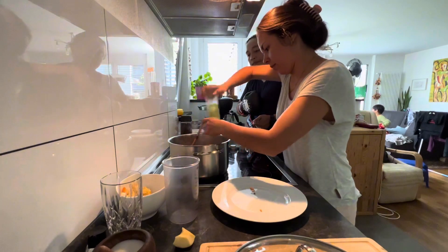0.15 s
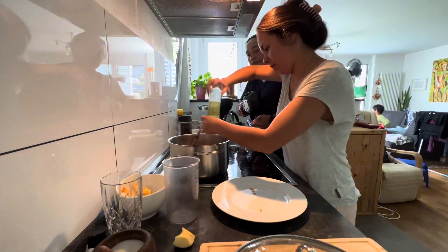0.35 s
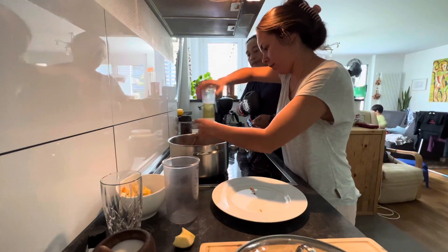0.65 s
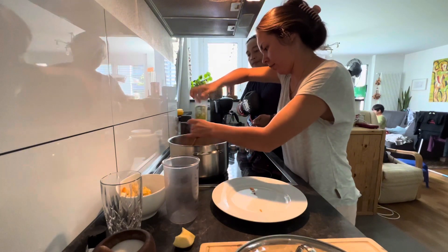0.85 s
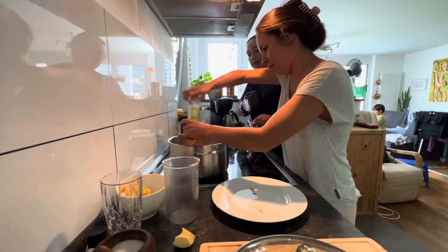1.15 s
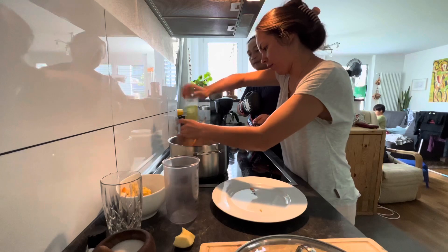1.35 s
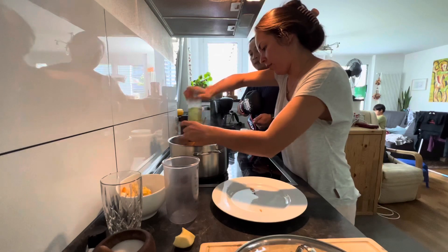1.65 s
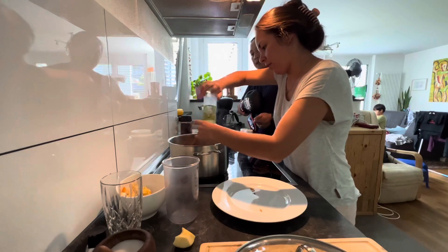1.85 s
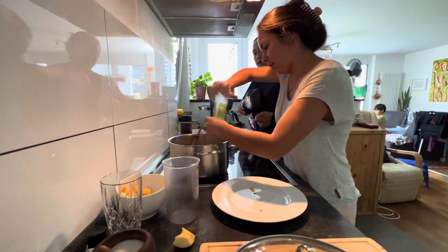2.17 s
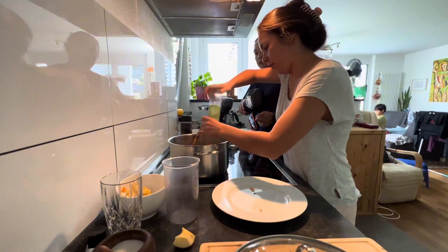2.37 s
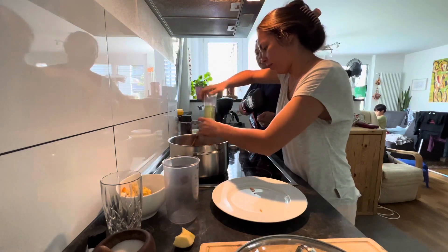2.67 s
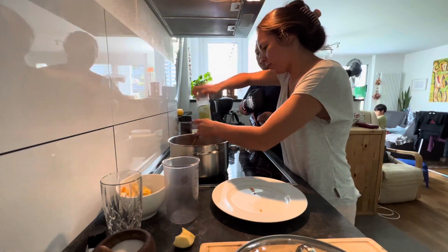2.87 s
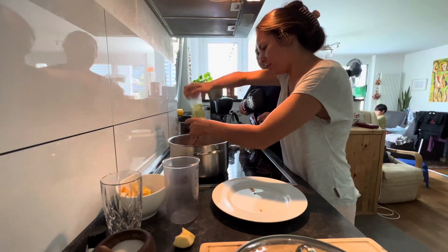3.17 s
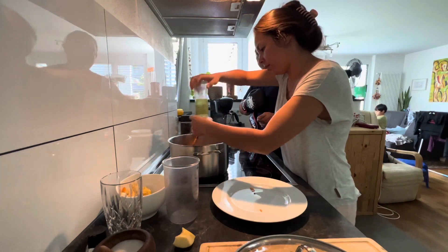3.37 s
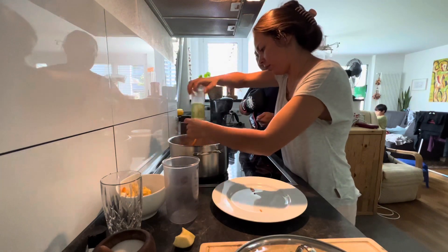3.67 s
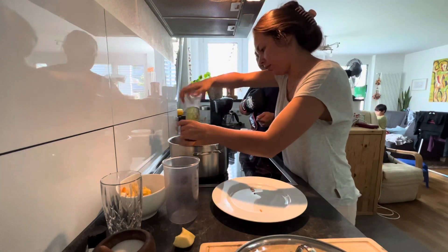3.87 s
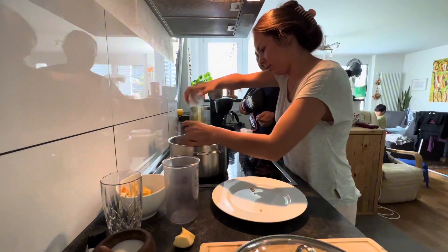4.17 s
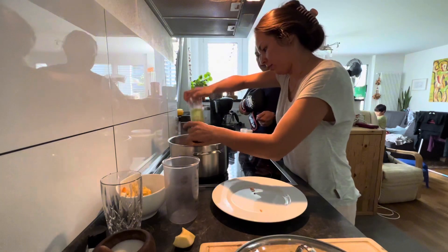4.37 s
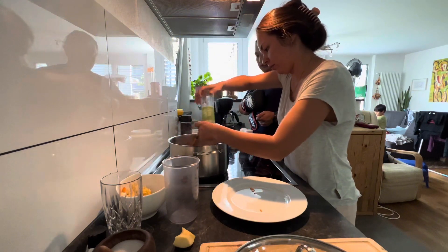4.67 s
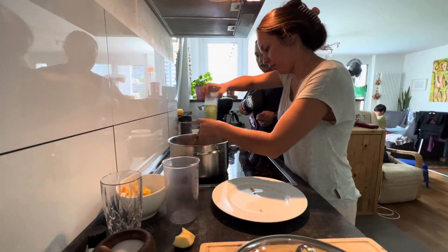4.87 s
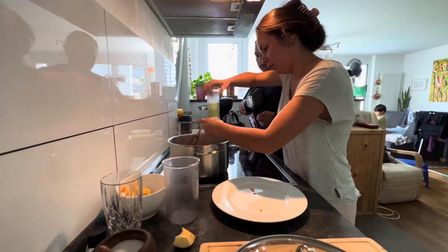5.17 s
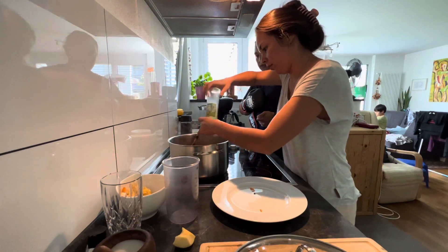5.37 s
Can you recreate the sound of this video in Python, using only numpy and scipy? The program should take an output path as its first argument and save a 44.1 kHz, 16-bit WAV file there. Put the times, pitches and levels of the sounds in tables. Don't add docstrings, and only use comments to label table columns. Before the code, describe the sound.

In a home kitchen, a glass-bodied pepper mill is twisted by hand close to a stereo microphone. From about 0.13 s the turns come every 0.3 s, each a short burst under a tenth of a second: a sharp dry snap, then gritty splintering of peppercorns with a small hollow, glassy resonance. Strength varies; turns near 0.77, 1.94 and 3.74 s bite hard, the one at 1.06 s starts weakly, and an especially loud crack comes around 4.07 s. Between turns, fingers rub and slide faintly, and soft low palm thuds come through the counter. After the turn at 4.33 s there is a gap with only small rustles, then grinding resumes at 4.9 and 5.19 s, ending in a gentler, duller crunch from 5.46 s as the sound cuts off. Tiles give quick reflections and a short bright tail. A quiet airy extractor fan with faint low hum continues throughout.

```python
import sys
import numpy as np
from scipy import signal
from scipy.fft import rfft, irfft, next_fast_len
from scipy.io import wavfile

SR = 44100
rng = np.random.default_rng(int(sys.argv[2]) if len(sys.argv) > 2 else 0)


def volts_from_db(level):
    exponent = np.asarray(level, float) / 20
    return 10 ** exponent


def generate_wav(signal):
    frames = np.transpose(np.atleast_2d(signal))
    scaled = np.clip(frames, -1, 1) * 32767
    pcm = np.round(scaled).astype(np.int16)
    wavfile.write(sys.argv[1], SR, pcm)


N = 243413
SIZE = next_fast_len(N + SR)
HZ = np.maximum(np.arange(SIZE // 2 + 1) * SR / SIZE, 1.)
PORT_LAG_S = 11.15 / 44100


def rms_one(x):
    return x / np.sqrt(np.mean(x ** 2) + 1e-20)


def at_hz(points, hz):
    table_hz, values = np.transpose(points)
    return np.interp(np.log(hz), np.log(table_hz), values)


def colour(x, spectrum):
    cepstrum = irfft(np.log(volts_from_db(at_hz(spectrum, HZ))), SIZE)
    cepstrum[1:SIZE // 2] *= 2
    cepstrum[SIZE // 2 + 1:] = 0
    response = np.exp(rfft(cepstrum))
    return irfft(rfft(x, SIZE) * response, SIZE)[..., :N]


def split(x, low_hz, high_hz):
    low = signal.sosfilt(signal.butter(2, low_hz, fs=SR, output="sos"), x)
    high = signal.sosfilt(signal.butter(2, high_hz, "high", fs=SR, output="sos"), x)
    return low, x - low - high, high


def drift(hz):
    r = np.exp(-2 * np.pi * hz / SR)
    noise = rng.standard_normal(N + SR)
    return rms_one(signal.lfilter([1], [1, -2 * r, r * r], noise)[SR:])


def ring(clicks, hz, t60):
    r = volts_from_db(-60 / (t60 * SR))
    w = 2 * np.pi * hz / SR
    return signal.lfilter([0, np.sin(w)], [1, -2 * r * np.cos(w), r * r], clicks + 1e-18)


def grains(per_s, uneven_db):
    sizes = volts_from_db(uneven_db * np.minimum(rng.exponential(1, N), 4)) * rng.choice([-1, 1], N)
    return rms_one(sizes * (rng.random(N) < per_s / SR))


def add_at(track, s, burst):
    i = round(s * SR)
    track[..., i:i + burst.shape[-1]] += burst[..., :N - i]


def ports(pair, shared, low_hz, high_hz):
    low = 1 / (1 + (HZ / low_hz) ** 2)
    high = 1 / (1 + (high_hz / HZ) ** 30)
    late = np.exp(-2j * np.pi * HZ * PORT_LAG_S * np.array([[0], [1]]))
    diffuse = np.sqrt(np.clip(1 - low - high, 0, 1)) * pair
    return diffuse + (np.sqrt(low) + np.sqrt(high) * late) * shared


# (frequency [Hz], level [dB per Hz])
AIRFLOW = [(20, -33), (50, -16), (80, -18), (120, -9), (180, -24), (300, -20), (600, -36), (1000, -28),
           (1500, -16), (1900, -13), (2350, -31), (4000, -41), (5500, -36), (8000, -37), (12000, -43),
           (16500, -48)]


def fan():
    white = rfft(rng.standard_normal((3, SIZE)))
    air = ports(white[:2], white[2], low_hz=150, high_hz=11000) * volts_from_db(at_hz(AIRFLOW, HZ))
    air = irfft(air, SIZE)[:, :N]
    hum_hz, hum_db, air_db = 100, -64.5, -60
    hum = np.sin(2 * np.pi * hum_hz * np.arange(N) / SR + drift(2.8))
    hum *= volts_from_db(hum_db + 2.4 * drift(5.9))
    return volts_from_db(air_db + 0.14 * drift(11.0)) * rms_one(air) + hum


# (time [s], level [dB])
RUBBING = [(0, -47.5), (0.6, -54), (1.5, -49), (2.3, -53.5), (3.1, -52.5), (3.9, -53), (4.35, -49),
           (4.65, -85), (4.9, -51.5), (5.1, -55.5), (5.52, -50)]
# (start [s], length [s], grinding [dB], first bite [dB], low share [dB])
TURNS = [(0.1263, 0.095, -39, -24, 4), (0.4513, 0.094, -39.5, -23.5, 2), (0.7714, 0.075, -35, -12, 2.5),
         (1.0593, 0.065, -39.5, -32.5, -2.5), (1.3255, 0.082, -39, -25, -6),
         (1.6415, 0.053, -40.5, -19, 3.5), (1.943, 0.066, -29, -17, 0.5), (2.2346, 0.051, -35, -15, 2.5),
         (2.5405, 0.1, -44.5, -18, 4), (2.8477, 0.072, -40, -30, 0.5), (3.155, 0.086, -41, -19, 1),
         (3.4353, 0.076, -41, -19.5, 4.5), (3.7367, 0.082, -32.5, -17, -0.5),
         (4.0308, 0.081, -35.5, -27.5, -4), (4.3332, 0.052, -36.5, -26.5, 3), (4.897, 0.05, -40.5, -24, 2),
         (5.191, 0.053, -38, -31, 0.5), (5.462, 0.19, -45, -51, 7)]


def friction():
    engage_s, release_s = 0.0032, 0.0065
    creep_db, creep_s = -15, 0.004
    loading_db, dulling_db = -4, 2
    rub_low_db, lift_low_db, lift_s = -2.5, -10, 0.07
    t = np.arange(N) / SR
    level = volts_from_db(np.interp(t, *np.transpose(RUBBING)) - 17.5) * np.ones((3, 1))
    lift = sum(np.clip(1 + (t - s) / lift_s, 0, 1) * (t < s) for s, *_ in TURNS)
    level[0] *= volts_from_db(rub_low_db + lift_low_db * lift + 11.5)
    for s, length_s, db, _, low_db in TURNS:
        i = round(s * SR)
        before = t[SR // 20:0:-1]
        level[:, i - SR // 20:i] += volts_from_db(db + creep_db) * np.exp(-before / creep_s)
        since = t[:min(SR // 3, N - i)]
        done = np.minimum(since / length_s, 1) - 0.5
        gain = volts_from_db(db - 5.5 + loading_db * done) * (1 - np.exp(-since / engage_s))
        gain *= np.exp(-np.maximum(since - length_s, 0) / release_s)
        even = np.ones_like(gain)
        level[:, i:i + len(since)] += gain * [volts_from_db(low_db + dulling_db * done + 8.0), even, even]
    return level * volts_from_db(3.2 * drift(70))


# (time [s], peak [dB], low share [dB],
# crumble time [s])
CRACKS = [(0.159, -17.5, -6.5, 0.019), (0.179, -18, -13, 0.014), (0.4853, -18.5, -34, 0.009),
          (0.5343, -31, 4.5, 0.011), (0.7527, -29.5, 3, 0.018), (1.0754, -28, -3, 0.017),
          (1.1104, -27.5, 2.5, 0.016), (1.3537, -23, 5, 0.0049), (1.3855, -13, -2, 0.0065),
          (1.6834, -18.5, -2, .011), (1.706, -20.5, 5.5, 0.005), (1.9805, -17, -9.5, 0.004),
          (2.29, -20, -10, 0.011), (2.305, -21, -14, 0.0037), (2.5236, -29, 3.5, 0.019),
          (2.598, -18.5, -5.5, 0.012), (2.6405, -23, 2, 0.0085), (2.8614, -18, -1.5, 0.0095),
          (2.8925, -18, 0.5, 0.018), (3.1747, -28.5, 13, 0.0064), (3.2077, -37, -7, 0.023),
          (3.493, -28, -22, 0.013), (3.516, -23, 0, 0.018), (3.7457, -15, -3, 0.0096),
          (3.7693, -15, -8, 0.0078), (4.0698, -5.5, -5, 0.014), (4.369, -12.5, -4, 0.01),
          (5.2229, -18, 3.5, 0.0064), (5.2699, -19, 1.5, 0.0049), (5.502, -22, -2, 0.024)]
# (time [s], peak [dB], high share [dB])
GRIPS = [(0.412, -67, 4), (0.6828, -52, 7.5), (0.967, -57, 16.5), (1.034, -34.5, 0), (1.28, -61, 19),
         (1.5933, -42.5, 3), (1.8706, -47, 14), (1.9031, -39.5, 3), (2.17, -52, 15.5), (2.205, -43.5, 11),
         (2.4638, -57.5, 20), (2.804, -58, 17), (3.0805, -53.5, 0), (3.119, -51.5, 12.5), (3.7125, -51, 13),
         (3.94, -43, 1), (4.0129, -34, -12), (4.557, -46, -4), (4.637, -55, 12), (4.865, -63, 16),
         (5.1083, -61, 19), (5.1667, -44, -2), (5.4191, -79, -13)]


def breaks():
    bites = [(s, bite_db, -8.5, -3.5, 0.0096) for s, _, _, bite_db, _ in TURNS]
    cracks = [(s, db, low_db, -5, crumble_s) for s, db, low_db, crumble_s in CRACKS]
    slides = [(s, db, -8, high_db, 0.022) for s, db, high_db in GRIPS]
    return bites + cracks + slides


# (frequency [Hz], level [dB], t60 [s])
JAR_MODES = [(313, -2.5, 0.024), (577, -12, 0.026), (857, -7.5, 0.12), (1092.6, 8.5, 0.054),
             (1264, -0.5, 0.12), (1362, 3.5, 0.03), (939, -2, 0.019), (1923, -23, 0.15), (3233, -9, 0.068),
             (3100, -8, 0.02), (3444, -21, 0.075), (4535, -5.5, 0.032), (5940, -3.5, 0.035),
             (6170, -6.5, 0.084)]
# (frequency [Hz], level [dB per Hz])
CRUNCH = [(30, -32.5), (150, -18.5), (300, -12), (450, -6.5), (700, -5.5), (1100, -9.5), (2000, 5.5),
          (2500, 1.5), (3200, 4), (4400, -5.5), (6000, -1), (7500, -8), (10000, -6), (13300, -15),
          (15600, -13.5), (16300, -36)]


def mill():
    onset_share, snap_loss_db_per_s = 0.37, 415
    snap_s, grip_damping_db = 0.0031, 2.2
    splinters = grains(4000, uneven_db=3.6)
    effort, snaps = friction(), np.zeros((3, N))
    t = np.arange(SR // 5) / SR
    for s, peak_db, low_db, high_db, crumble_s in breaks():
        force = volts_from_db([[low_db + 11.5], [0], [high_db + 3.0]]) * volts_from_db(peak_db - 15.0)
        fade_s = max(crumble_s, 0.002)
        swell = 1 - np.exp(-t / (onset_share * fade_s))
        add_at(effort, s, force * swell * np.exp(-t / fade_s))
        brittle = np.clip((peak_db + 45) / 15, 0, 1)
        snap = brittle * force * volts_from_db(1 - snap_loss_db_per_s * crumble_s) * volts_from_db([[2], [8], [9]])
        add_at(snaps, s, snap * np.exp(-t / snap_s))
    drive = effort * splinters + snaps * rng.choice([-1, 1], N)
    source = sum(split(d, 1248, 3400)[k] for k, d in enumerate(drive))
    source += volts_from_db(6.5) * split(snaps[2] * rng.choice([-1, 1], N), 1000, 12200)[2]
    body = np.zeros(N)
    for k, (hz, db, t60) in enumerate(JAR_MODES):
        held = source * volts_from_db(grip_damping_db * drift(2.37))
        body += volts_from_db(db - 35) * ring(held, hz, t60) * (-1) ** k
    return volts_from_db(7.5) * colour(source + body, CRUNCH)


# (frequency [Hz], t60 [s])
KITCHEN_T60 = [(200, 0.35), (530, 0.43), (1400, 0.22), (3700, 0.3), (9700, 0.34), (15000, 0.099)]


def kitchen(x, wet_db, wall_db, count):
    t = np.arange(SR // 2) / SR
    tails, edges = 0, 60 * 2. ** np.arange(9)
    for low, high in zip(edges, np.append(edges[1:], 19000)):
        sos = signal.butter(2, [low, high], "band", fs=SR, output="sos")
        decay = volts_from_db(-60 * t / at_hz(KITCHEN_T60, np.sqrt(low * high)))
        tails = tails + decay * signal.sosfilt(sos, rng.standard_normal((count, 3, len(t))))
    tails = tails * (1 - np.exp(-t / 0.00022)) * volts_from_db(wet_db)
    pose = np.array([drift(27.2) for _ in range(count)])
    pose /= np.sqrt(np.sum(pose ** 2, axis=0))
    late = sum(rfft(tail, SIZE) * rfft(x * share, SIZE) for tail, share in zip(tails, pose))
    direct_s = np.array([[0], [PORT_LAG_S]])
    wall_s = np.array([[0.0014], [0.0021]])
    early = np.exp(-2j * np.pi * HZ * direct_s) + volts_from_db(wall_db) * np.exp(-2j * np.pi * HZ * wall_s)
    whole = rfft(x, SIZE)
    heard = ports(early * whole + late[:2], whole + late[2], low_hz=207, high_hz=9640)
    return irfft(heard, SIZE)[:, :N]


# (time [s], peak [dB], frequency [Hz])
KNOCKS = [(0.376, -59.5, 110), (0.684, -61.5, 118), (0.976, -62, 135), (1.055, -62, 107), (1.285, -62, 122),
          (1.576, -57.5, 126), (1.869, -70, 156), (2.128, -60, 105), (2.168, -67, 94.2), (2.465, -60.5, 97),
          (2.651, -56, 122), (2.765, -63, 147), (2.902, -55.5, 127), (3.08, -62, 108), (3.359, -72, 110),
          (3.598, -64, 106), (3.659, -65, 141), (3.965, -53, 94), (4.256, -60.5, 127), (4.53, -67, 111.6),
          (4.799, -79, 107), (5.146, -61.5, 131), (5.42, -58.5, 103)]


def knocks():
    rumble_db, rumble_s = -6, 0.042
    thuds, drag = np.zeros(N), np.zeros(N)
    t = np.arange(SR // 8) / SR
    for s, peak_db, hz in KNOCKS:
        envelope = (t / 0.0024) * np.exp(1 - t / 0.0074)
        add_at(thuds, s, volts_from_db(peak_db + 1.5) * np.sin(2 * np.pi * hz * t) * envelope)
        add_at(drag, s, volts_from_db(peak_db + rumble_db) * (1 - np.exp(-t / 0.005)) * np.exp(-t / rumble_s))
    return thuds + drag * rms_one(split(rng.standard_normal(N), 60, 290)[1])


def scene():
    return kitchen(mill(), wet_db=-30, wall_db=-6.0, count=6) + knocks() + fan()


def low_pass(x):
    return signal.sosfilt(signal.butter(12, 16810, fs=SR, output="sos"), x)


# (frequency [Hz], level difference [dB])
LEFT_OVER_RIGHT = [(30, 0), (150, 4), (380, -4), (1200, 2), (2400, 1.5), (3500, 4), (6000, 10), (8000, 3.5),
                   (9500, -3)]


def record(dry):
    tilt = volts_from_db(at_hz(LEFT_OVER_RIGHT, HZ) / 2 * np.array([[1], [-1]]))
    mix = irfft(rfft(dry, SIZE) * tilt, SIZE)[:, :N]
    return low_pass(mix)


dry = scene()
out = record(dry)
generate_wav(out)
```